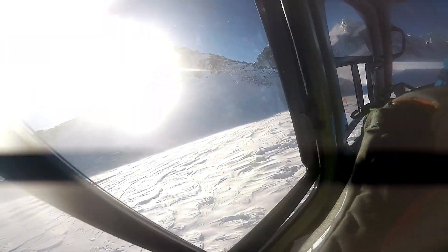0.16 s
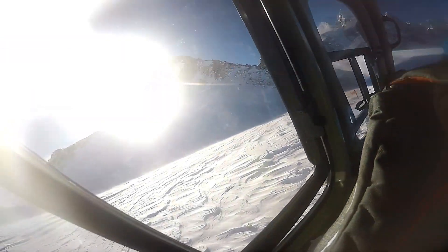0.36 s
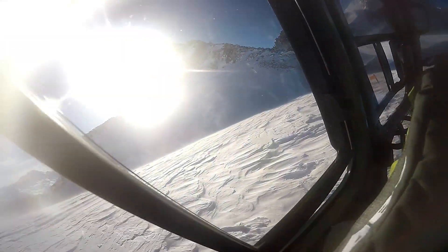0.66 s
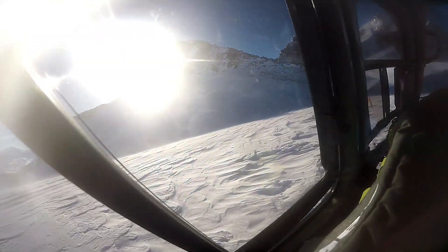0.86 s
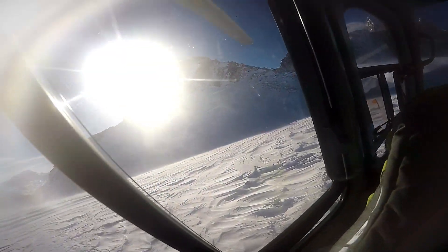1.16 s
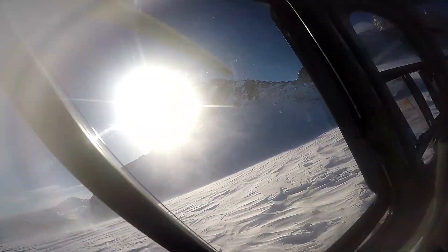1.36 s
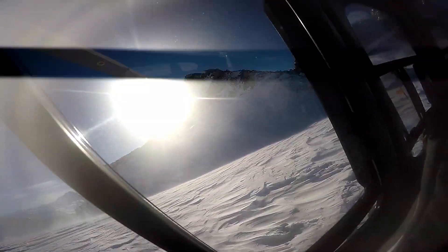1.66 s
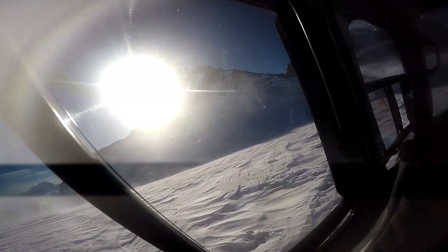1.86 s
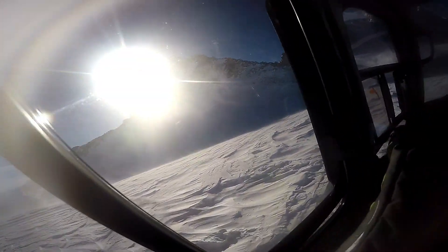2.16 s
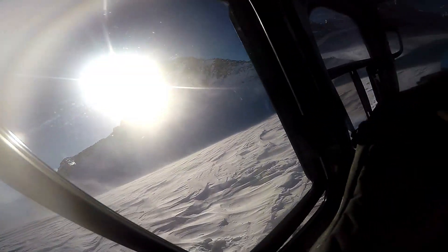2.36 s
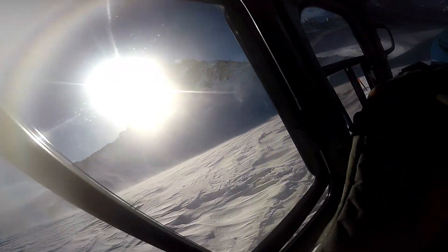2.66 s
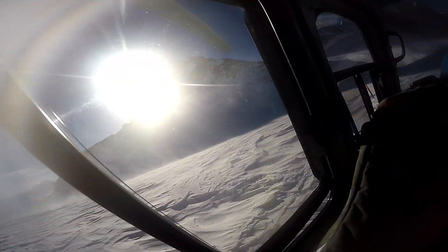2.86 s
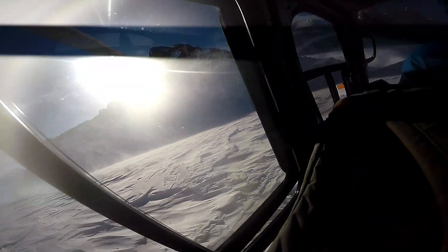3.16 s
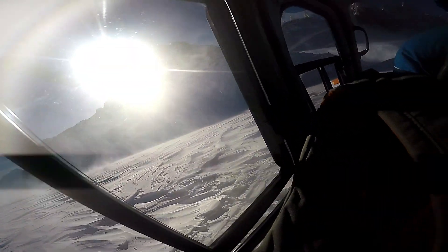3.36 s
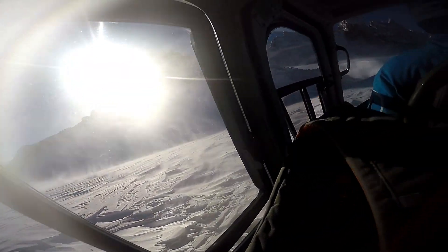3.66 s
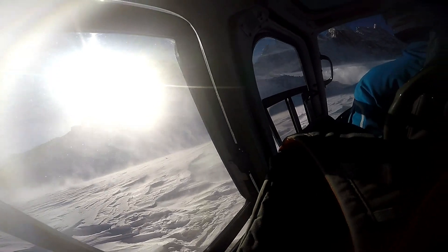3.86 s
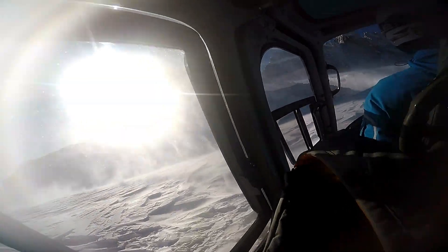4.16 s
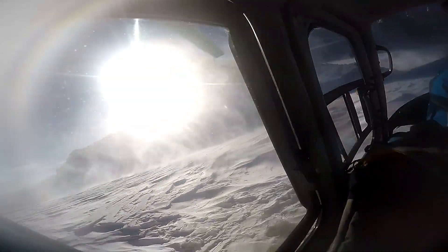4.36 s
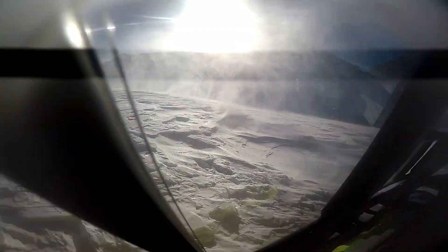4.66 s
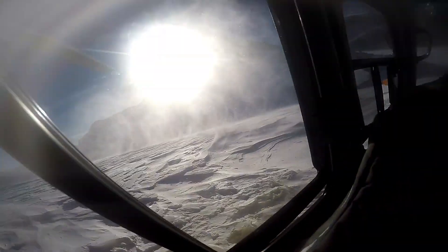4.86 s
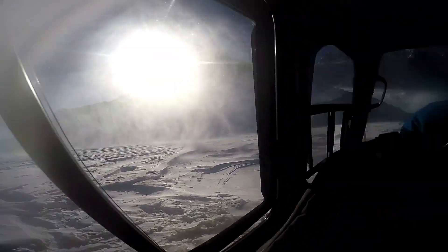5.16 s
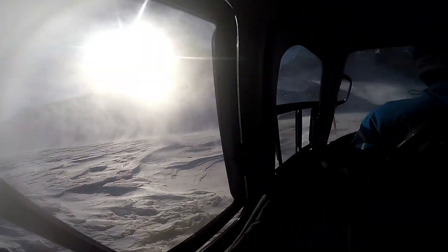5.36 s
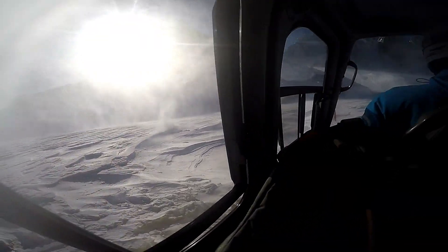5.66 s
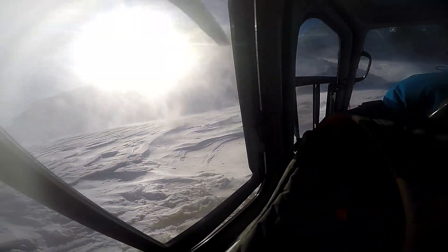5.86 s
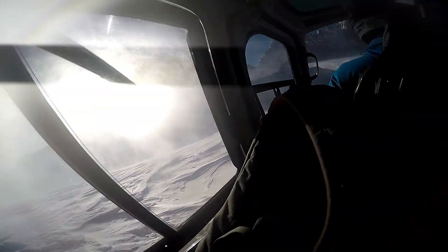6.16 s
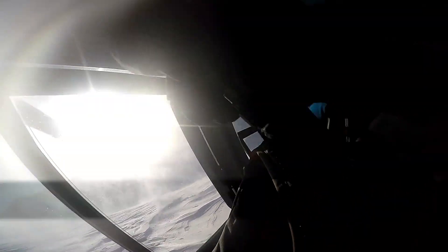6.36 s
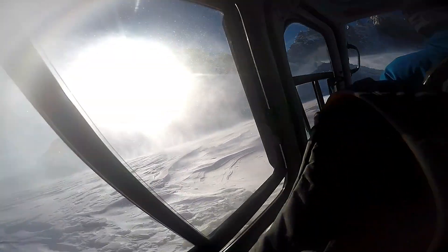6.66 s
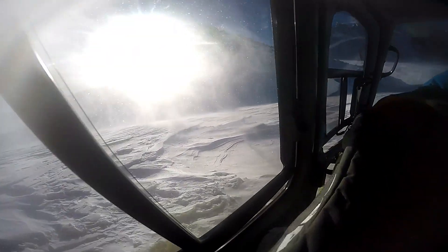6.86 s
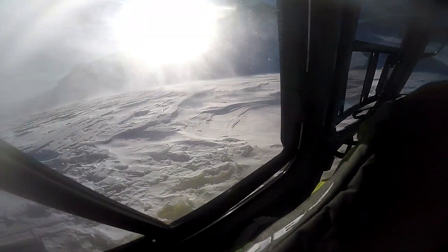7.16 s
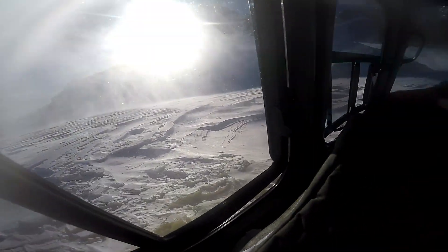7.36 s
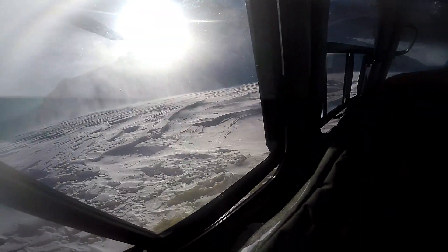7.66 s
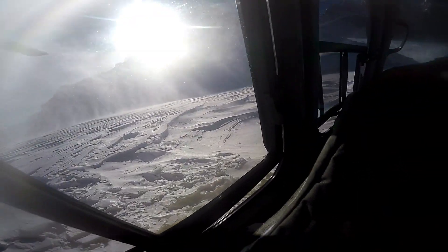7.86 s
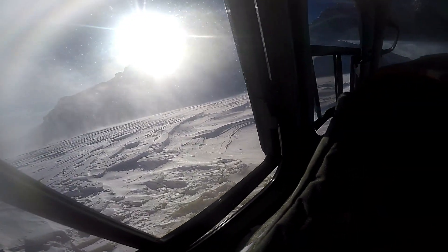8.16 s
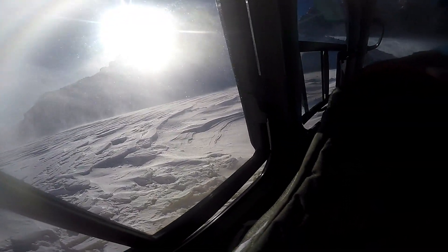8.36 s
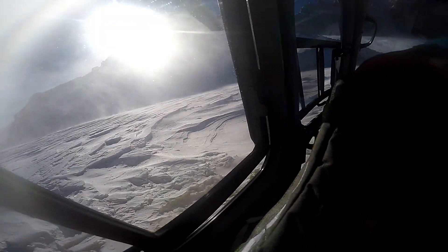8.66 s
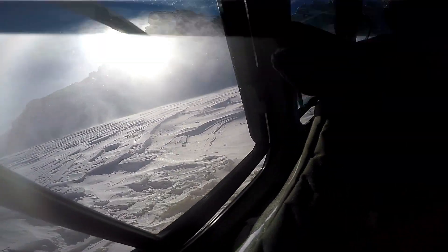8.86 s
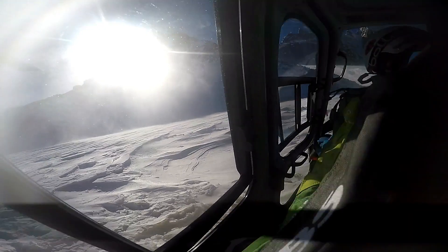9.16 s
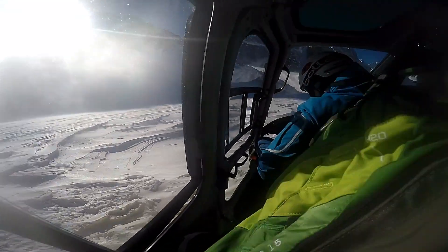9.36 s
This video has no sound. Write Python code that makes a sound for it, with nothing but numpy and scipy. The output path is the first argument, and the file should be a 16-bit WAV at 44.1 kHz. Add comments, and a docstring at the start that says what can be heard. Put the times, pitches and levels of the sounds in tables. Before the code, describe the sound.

Close inside a helicopter cabin, low rotor throb about nineteen beats a second, buzzing tail rotor, wavering gear whine and blade-chopped air roar fill everything. Small taps of loose gear come and go. Around 4.6 seconds a hard dry knock overloads the microphone; the drone dips sharply, then swells back as rotor loading eases and fabric rustles softly.

```python
"""Helicopter cabin with a hard knock

Inside a turbine helicopter hovering low over snow: rotor throb and gearbox tones are fluttering tones,
compressor whine is tone and roughened tone, and air roar is bands of noise pulsed by the blades.
Loose gear taps and fabric rustles now and then: struck resonances and short swells of noise.
About halfway something knocks hard on the microphone's housing; the recorder overloads,
and its gain control ducks the whole sound and lets it swell back."""
import sys
import numpy as np
from scipy import signal
from scipy.io import wavfile
from scipy.ndimage import uniform_filter1d, minimum_filter1d

SR = 44100
rng = np.random.default_rng(int(sys.argv[2]) if len(sys.argv) > 2 else 0)


def inscribe(sig):
    """Save sig as 16-bit PCM at rate SR to the path in sys.argv[1].

    A 1-D sig is mono; a 2-D sig holds one channel per row.
    Samples are clipped to [-1, 1] before scaling.
    """
    pcm = np.round(np.clip(np.atleast_2d(sig).T, -1, 1) * 32767)
    wavfile.write(sys.argv[1], SR, pcm.astype(np.int16))


N = 419832
TIME = np.arange(N) / SR   # seconds

# The compressor blade tone climbs at first, then sinks as power comes off.
# Each row: time in seconds, pitch in Hz.
COMPRESSOR_PITCH = [(0, 8390), (1, 8540), (2, 8560), (3, 8720), (4.5, 8850), (5, 8730), (5.5, 8450),
                    (6.5, 8170), (7.7, 7960), (9.5, 7940)]

# The main blades and the tail rotor turn with the power shaft.
BLADE_RATIO, TAIL_RATIO = .1927, .6825   # blade passes, tail tone cycles; both per shaft turn
MEAN_LOADING_DB = -28   # reference level for blade loading


def from_db(db):
    """Turn decibels into a plain multiplier."""
    return 10 ** (np.asarray(db) / 20)


def rms_one(x):
    """Scale a sound to an average strength (rms) of 1."""
    return x / np.sqrt(np.mean(x ** 2) + 1e-20)


def in_time(rows):
    """Draw each column of a time table as a line, sample by sample."""
    seconds, *columns = np.transpose(rows)
    return [np.interp(TIME, seconds, column) for column in columns]


def at_hz(points, hz):
    """Read a spectrum at one frequency, along a log-frequency axis."""
    point_hz, value = np.array(points)[:, 0], np.array(points)[:, 1]
    return np.interp(np.log(hz), np.log(point_hz), value)


def cut(x, hz, kind, order=2):
    """Keep part of the spectrum with a smooth (Butterworth) filter."""
    safe_hz = np.clip(hz, 10, .45 * SR)
    return signal.sosfilt(signal.butter(order, safe_hz, kind, fs=SR, output="sos"), x)


def resonate(x, hz, width):
    """Let through a narrow band, width Hz wide, with gain 1 at its top."""
    return signal.lfilter(*signal.iirpeak(hz, hz / width, fs=SR), x)


def drift(rate):
    """Slow random wandering with spread 1, mostly below about rate Hz."""
    step = 40   # one random value per 40 samples, joined by straight lines
    r = np.exp(-2 * np.pi * step * rate / SR)
    noise = rng.standard_normal(N // step + 2002)
    slow = signal.lfilter([1], [1, -2 * r, r * r], noise)[2000:]   # drop the filter's start-up
    return np.interp(np.arange(N) / step, np.arange(len(slow)), rms_one(slow))


def angle(hz):
    """Running angle, in radians, of something that turns hz times a second."""
    return 2 * np.pi * np.cumsum(hz * np.ones(N)) / SR


def tone(phase, rough, rate):
    """A tone of rms 1 whose height and phase flutter at random."""
    steady_part = (1 + rough * drift(rate)) * np.cos(phase)
    return rms_one(steady_part + rough * drift(rate) * np.sin(phase))


def ring(push, modes):
    """A push sets each mode ringing at its own pitch, level and 60 dB fading time (t60)."""
    out = np.zeros(N)
    for hz, db, t60 in modes:
        r = from_db(-60 / (t60 * SR))
        w = 2 * np.pi * hz / SR
        ringing = signal.lfilter([0, np.sin(w)], [1, -2 * r * np.cos(w), r * r], push + 1e-18)
        out += from_db(db) * ringing
    return out


def clicks(rows):
    """One single-sample push for each row of seconds and dB."""
    out = np.zeros(N)
    for seconds, db in rows:
        out[round(seconds * SR)] += from_db(db)
    return out


def burst(push, t60):
    """Noise that fades by 60 dB in t60 seconds after each push."""
    fade = np.exp(-np.log(1000) / (t60 * SR))
    return signal.lfilter([1], [1, -fade], push + 1e-18) * rng.standard_normal(N)


def noise_bands(low_hz, high_hz, count):
    """Neighbouring bands of unrelated noise, each with its centre in Hz."""
    edges = np.geomspace(low_hz, high_hz, count + 1)
    return [(np.sqrt(a * b), cut(rng.standard_normal(N), [a, b], "band"))
            for a, b in zip(edges, edges[1:])]


def rotors(shaft, loading_db):
    """Main blades push pressure waves, thudding harder under load; the tail rotor buzzes."""
    # The deep pulse at the blade rate. Each row: time in seconds, level in dB.
    pulse = [(0, -27.5), (2.8, -20.5), (3.9, -32.5), (4.4, -20.5), (5.3, -23.5), (6.9, -19.5), (7.5, -25),
             (9.5, -22.5)]
    # Higher main rotor harmonics. Each row: multiple of the blade rate, level in dB against the 3rd.
    thud = [(4, -24.5), (5, -21), (6, -25), (7, -17)]
    # Tail rotor. Each row: multiple of its base tone, level in dB.
    tail_tones = [(1, -28), (2, -49.5), (3, -51.5), (4, -57), (5, -55)]
    third_db = -32 + .75 * loading_db   # dB at the reference loading, dB gained per dB of loading

    def wave(k):
        """Phase of harmonic k; the cabin delays higher ones more, smearing each thud."""
        return k * BLADE_RATIO * shaft - np.pi / 2 * k ** 2

    main = from_db(in_time(pulse)[0]) * tone(wave(1), rough=.14, rate=3)
    main += from_db(MEAN_LOADING_DB + loading_db) * tone(wave(2), rough=.18, rate=3)
    main += from_db(third_db) * tone(wave(3), rough=.35, rate=3)
    for k, db in thud:
        main += from_db(third_db + db) * tone(wave(round(k)), rough=0.99, rate=2.1)

    tail = from_db(tail_tones[0][1]) * tone(TAIL_RATIO * shaft, rough=0.1, rate=1.5)
    for k, db in tail_tones[1:]:
        tail += from_db(db) * tone(round(k) * TAIL_RATIO * shaft, rough=0.66, rate=3.4)
    return main + tail


def gearbox(shaft, power, loading_db):
    """Meeting gear teeth sing at fixed multiples of the shaft speed, fluttering under load."""
    # The bevel gear's whine swells and fades. Each row: time in seconds, level in dB.
    bevel = [(0, -43), (.25, -43.5), (.6, -51.5), (.82, -41), (1.9, -44.5), (2.95, -44.5), (3.3, -60),
             (3.6, -43), (4.27, -41.5), (4.5, -51.5), (5.38, -37), (5.65, -52.5), (6.12, -38), (6.52, -47),
             (6.75, -33), (7, -39), (7.13, -58), (7.3, -39.5), (7.8, -56), (8.38, -37.5), (8.8, -43),
             (9.03, -50), (9.25, -34.5), (9.5, -46.5)]
    # Planetary gear tones. Each row: multiple of the mesh rate, level in dB at zero power and
    # reference loading, dB gained at full power, dB gained per dB of blade loading.
    planet = [(1, -62, 13, 0), (2, -54.5, 1, 0.48), (3, -60.5, 10, -0.25), (4, -63, 8.5, -0.5),
              (5, -65, 14, 0), (6, -58, 4.5, -.55), (7, -67, 2.5, -.5), (8, -64.5, -3, 0.5),
              (9, -69.5, 0.5, -.5)]
    # Power shaft hum. Each row: multiple of the shaft speed, level in dB.
    hum = [(1, -56.5), (3, -56)]
    bevel_teeth, planet_ratio = 17, 6.425   # tooth meetings per shaft turn

    out = from_db(in_time(bevel)[0]) * tone(bevel_teeth * shaft, rough=0.18, rate=16.3)
    for k, db, power_db, follows in planet:
        level_db = db + power_db * power + follows * loading_db
        out += from_db(level_db) * tone(round(k) * planet_ratio * shaft, rough=.4, rate=14)
    for k, db in hum:
        out += from_db(db) * tone(round(k) * shaft, rough=0.29, rate=3)
    return out


def turbine(eased):
    """Compressor blades whistle in a turbulent skirt, with a breathy upper stage and hissing bands."""
    # The thin whistle comes and goes. Each row: time in seconds, level in dB.
    whistle_level = [(0, -55), (1.3, -69), (3.9, -60.5), (4.6, -65), (5.5, -56.5), (7.4, -64), (9.5, -68)]
    compressor = angle(in_time(COMPRESSOR_PITCH)[0])
    upper_stage = 1.184 * compressor

    whistle = from_db(in_time(whistle_level)[0]) * tone(compressor, rough=0.97, rate=22)
    # Fast, strong flutter spreads these tones into bands of hiss.
    skirt = from_db(-57 - 7.4 * eased) * tone(compressor + angle(120), rough=8, rate=710)
    upper = from_db(-58.5 - 2.5 * eased) * tone(upper_stage, rough=5.3, rate=210)
    fixed_bands = from_db(-61.0) * tone(angle(7370), rough=8, rate=170)
    fixed_bands += from_db(-65.0) * tone(angle(11300), rough=8, rate=230)
    return whistle + skirt + upper + eased * fixed_bands   # fixed bands grow as power comes off


def blade_slaps(shaft, loading_db):
    """Each passing blade gives a sudden puff that dies away before the next; their bite varies."""
    rise, decay = .03, .11   # shares of a blade period
    scatter_db = 1.4   # chance difference from blade to blade
    swish_depth, slap_depth = 0.57, .18   # the slap depth is at the reference loading
    slap_follows = 1.8   # dB of slap per dB of loading, so it sets in steeply

    blades = BLADE_RATIO * shaft / (2 * np.pi) + .17
    since, which = blades % 1, blades.astype(int)
    bite = from_db(scatter_db * rng.standard_normal(which[-1] + 1))[which]
    shape = (1 - np.exp(-since / rise)) * np.exp(-since / decay)
    depth = swish_depth + slap_depth * from_db(slap_follows * loading_db)
    return depth * bite * shape / shape.max()


def air(shaft, eased, loading_db):
    """Downwash buffets the cabin and roars past the doors, surging with each passing blade."""
    # Downwash buffeting. Each row: time in seconds, level in dB.
    downwash = [(0, -32), (1.2, -32), (1.6, -28.5), (2, -32), (3.9, -34), (5.6, -29.5), (6.15, -32.5),
                (6.55, -39), (7.1, -33), (7.6, -36), (9.5, -35.5)]
    # Tone colour of the buffeting. Each row: frequency in Hz, relative level in dB per Hz.
    buffet_colour = [(75, 0.5), (100, -3.5), (135, -10), (175, -14), (250, -14), (360, -19.5), (500, -23),
                     (760, -24)]
    # Cabin air resonances. Each row: frequency in Hz, width in Hz, gain in dB of the part added.
    cavities = [(137, 31, -9), (450, 77, -24)]
    # Roar colour at high and at low power. Each row: frequency in Hz, relative level in dB per Hz.
    high_power_colour = [(600, -25.5), (800, 2.5), (1150, 3), (1500, 1.5), (2200, 0.5), (3050, 3.5),
                         (3550, -2.5), (4000, -6.5), (4600, -8.5), (5300, -4), (6800, -15), (9500, -15.5),
                         (12000, -18.5), (15500, -30)]
    low_power_colour = [(600, 7), (800, 1), (1100, -5.5), (1500, 0.5), (2300, 0), (3000, 1), (3500, 0),
                        (3950, 3.5), (4400, -2.5), (5500, -5), (7400, -11), (10300, -16), (12000, -14),
                        (15500, -19.5)]
    # Cabin panels and cavities colour the roar.
    # Each row: frequency in Hz, width in Hz, gain in dB of the part added.
    panels = [(1487, 240, -2.5), (3002, 82, 2), (4040, 130, -8), (4660, 33, -7), (4920, 160, -16),
              (6620, 67, -28)]

    buffet_db, = in_time(downwash)
    slaps = blade_slaps(shaft, loading_db)

    low = 0
    for hz, band in noise_bands(73.6, 706, count=9):
        low = low + band * from_db(at_hz(buffet_colour, hz) + 2.5 * drift(12))
    low = low + sum(from_db(db) * resonate(low, hz, width) for hz, width, db in cavities)
    buffet = from_db(buffet_db) * rms_one(low * (1 + 0.43 * slaps))

    deep_noise = rms_one(cut(rng.standard_normal(N), [22, 85], "band"))
    rumble = from_db(buffet_db - 3 + 0.84 * drift(5)) * deep_noise

    roar = 0
    for hz, band in noise_bands(687, 16470, count=26):
        colour_db = (1 - eased) * at_hz(high_power_colour, hz) + eased * at_hz(low_power_colour, hz)
        # The slaps hiss through the door seals: Hz, strength of the slaps.
        chop = at_hz([(1300, 0.75), (3300, 1.2), (5500, 0.77), (9000, 0.49)], hz)
        roar = roar + band * from_db(colour_db + 1.7 * drift(13)) * (1 + chop * slaps)
    roar = roar + sum(from_db(db) * resonate(roar, hz, width) for hz, width, db in panels)
    return rumble + buffet + from_db(-39.5 - 3 * eased) * rms_one(roar)


def taps():
    """Loose gear taps: a push rings dull modes and sets off a short bright rattle of noise."""
    # Each row: time in seconds, strength of the push in dB, rattle's push in dB against the dull one.
    tap_times = [(.718, -28, 6), (1.251, -33.5, -10), (4.486, -21, -24), (4.502, -44, -7),
                 (4.519, -20.5, 4.5), (6.268, -36, -14), (6.711, -46.5, 27), (7.4, -42.5, 24),
                 (7.654, -57, 11), (8.678, -55.5, 34)]
    # What the taps ring with. Each row: frequency in Hz, relative level in dB, 60 dB fade in seconds.
    tap_modes = [(760, -5, .02), (990, 12.5, 0.021), (1176, -19, .02), (1570, 6.5, 0.018)]
    dull = clicks([(s, db) for s, db, bright in tap_times])
    sharp = clicks([(s, db + bright) for s, db, bright in tap_times])
    rattle = resonate(burst(sharp, t60=0.02), 4000, 700)
    return from_db(-7.5) * ring(dull, tap_modes) + from_db(4) * cut(rattle, 5500, "low")


def rustles():
    """Clothing and bags rustle: soft, grainy noise that swells and fades as fabric brushes."""
    # Each row: middle in seconds, time in seconds from there to 1/e of the peak, peak level in dB.
    rustle_times = [(0.718, 0.03, -63), (4.502, 0.05, -33.5), (6.15, 0.28, -50), (7.14, 0.12, -51.5),
                    (9.293, 0.16, -44.5), (9.474, 0.12, -51.5)]
    level = sum(from_db(db) * np.exp(-((TIME - s) / length) ** 2) for s, length, db in rustle_times)
    grain = from_db(3 * drift(40))
    return level * rms_one(cut(rng.standard_normal(N), [720, 1350], "band") * grain)


def knock():
    """A blow on the housing: crack, ringing modes, and a shove of air that swings back slowly."""
    # The hard knock, then its bounces. Each row: time in seconds, strength of the push in dB.
    knock_times = [(4.5967, 50), (4.6025, 17.5), (4.61, 8), (4.6322, 10), (4.6358, 7)]
    # The housing's dead thock. Each row: frequency in Hz, relative level in dB, 60 dB fade in seconds.
    housing = [(560, -25, 0.018), (890, -15, 0.008), (1311, 4.5, 0.0049), (1974, 5, 0.0051)]
    # A small metal fitting that rings on.
    # Each row: frequency in Hz, relative level in dB, 60 dB fade in seconds.
    fitting = [(1836, -48.5, .16), (2568, -56, .27), (5448, -47, .055), (7251, -53, .055)]

    blow = clicks(knock_times[:1])
    push = cut(clicks(knock_times), 1700, "low")   # padded contact
    snap = burst(blow, t60=.021)
    crack = from_db(-10) * cut(snap, 2100, "low") + from_db(-20) * resonate(snap, 5400, 1500)

    since = TIME - knock_times[0][0]
    shove = -from_db(31) * np.exp(-((since - .0042) / .0014) ** 2)
    rebound = from_db(24) * np.exp(-((since - .013) / .007) ** 2)
    air_push = cut(shove + rebound, 11, "high")
    return ring(push, housing) + ring(blow, fitting) + crack + air_push


def scene():
    """All sources added together; engine power (0-1) follows the compressor's speed."""
    # The power shaft drives both rotors and the gearbox. Each row: time in seconds, turns per second.
    shaft_speed = [(0, 100.6), (1, 100.53), (2.6, 100.53), (4, 100.17), (5.5, 100.1), (6.4, 100.2),
                   (7.7, 99.68), (8.5, 99.85), (9.5, 99.9)]
    # Blade loading, as the level of the rotor's 2nd harmonic, ends low as the helicopter settles.
    # Each row: time in seconds, level in dB.
    loading = [(0, -28), (.4, -20.5), (1.1, -21), (1.45, -21), (1.8, -19.5), (2.1, -26), (3.6, -26),
               (4.2, -30), (6.3, -26.5), (6.65, -31.5), (7.4, -35.5), (9.5, -37.5)]
    # The colour shifts as power comes off. Each row: power from 0 to 1, share of the low-power colour.
    easing = [(.25, 0.99), (.6, 0.44)]

    shaft = angle(in_time(shaft_speed)[0])
    compressor_hz, = in_time(COMPRESSOR_PITCH)
    power = (compressor_hz - compressor_hz.min()) / np.ptp(compressor_hz)
    eased = np.interp(power, *np.transpose(easing))   # held flat beyond the table's ends
    loading_db = in_time(loading)[0] - MEAN_LOADING_DB

    machine = rotors(shaft, loading_db) + gearbox(shaft, power, loading_db)
    machine = machine + turbine(eased) + air(shaft, eased, loading_db)
    return (machine + taps() + rustles() + knock())[None]


def gain_control(x, depth_db, hold_s, release_s, ahead_s):
    """Ducks just ahead of overloads, holds, then recovers ever more slowly."""
    peak_db = 20 * np.log10(np.abs(x).max(axis=0) + 1e-9)
    over_db = np.clip(peak_db, 1e-6, depth_db)
    hold, ahead = int(hold_s * SR) | 1, int(ahead_s * SR)
    held = -minimum_filter1d(-over_db, hold, origin=hold // 2)   # largest overload of the last hold_s
    # The dB of ducking shrink exponentially unless a new overload lifts them.
    released = np.exp(np.maximum.accumulate(np.log(held) + TIME / release_s) - TIME / release_s)
    duck_db = np.maximum(released - 2.1, 0)   # small overshoots are not ducked
    early_db = np.pad(duck_db[ahead:], (0, ahead), "edge")
    return x * from_db(-uniform_filter1d(early_db, ahead))


def record(dry):
    """Gain control, soft overload that rounds off peaks, and the top cut off above 15300 Hz."""
    ducked = gain_control(dry, depth_db=27.5, hold_s=0.33, release_s=0.7, ahead_s=0.011)
    clipped = ducked / (1 + ducked ** 4) ** (1 / 4)
    return signal.sosfilt(signal.ellip(12, .1, 100, 15300, fs=SR, output="sos"), clipped)


dry = scene()
out = record(dry)
inscribe(out)
```